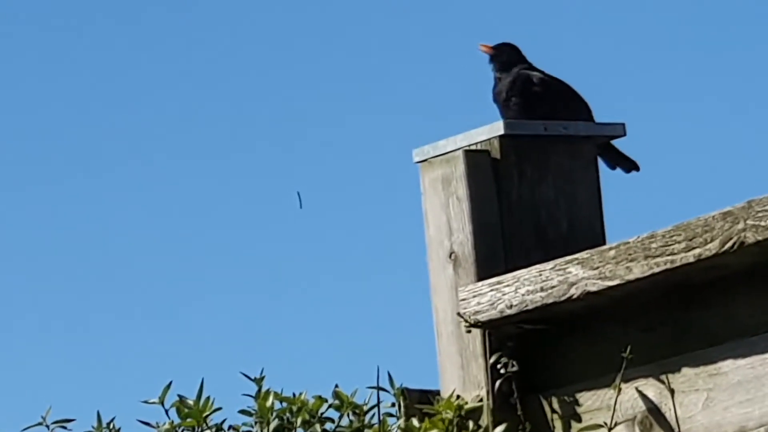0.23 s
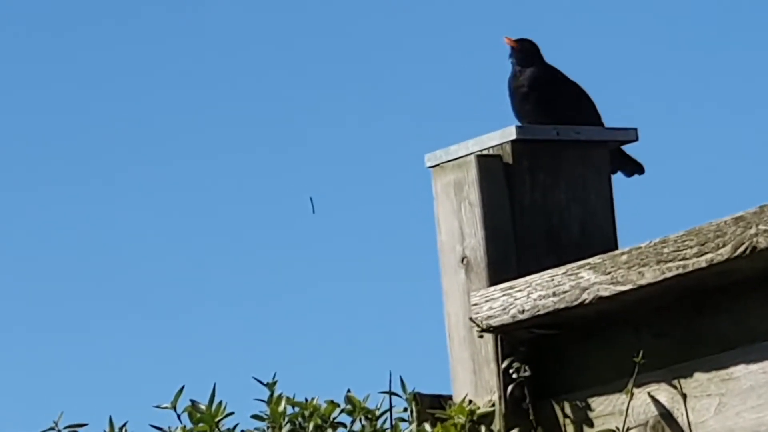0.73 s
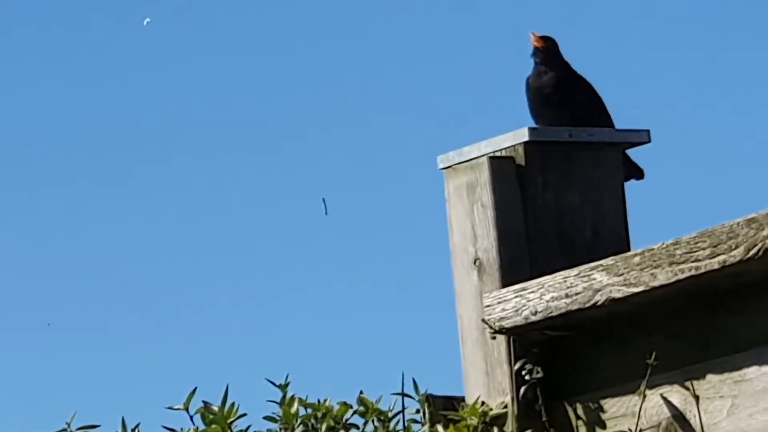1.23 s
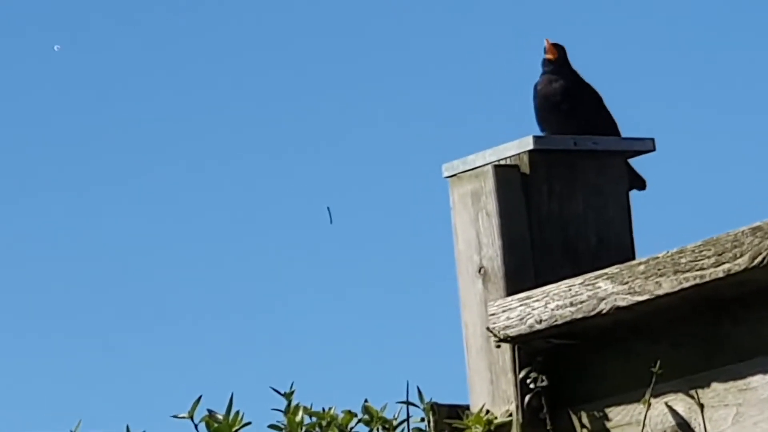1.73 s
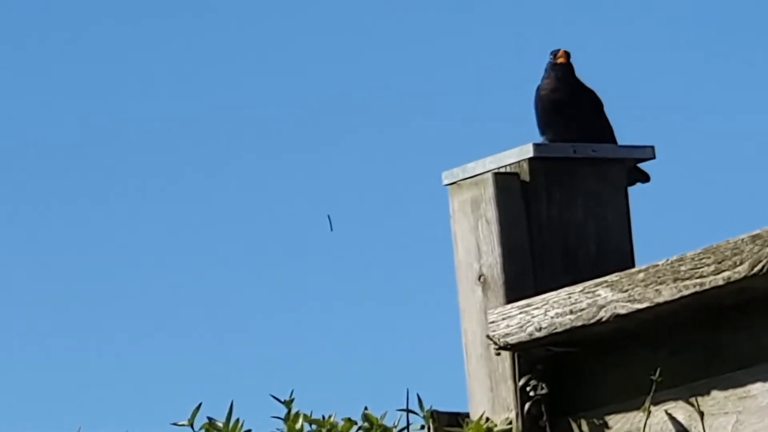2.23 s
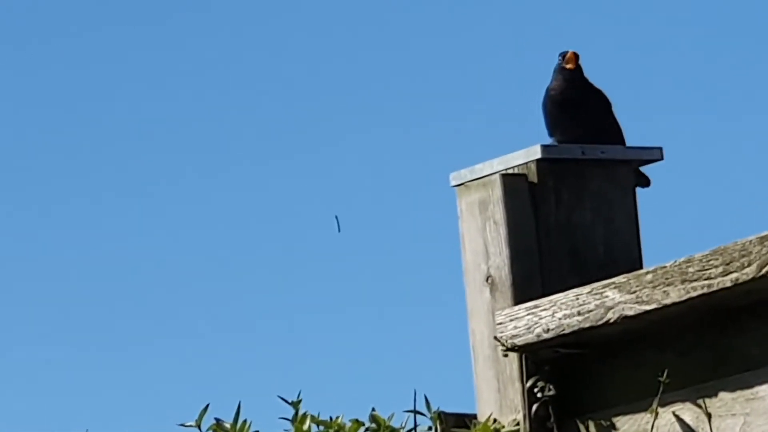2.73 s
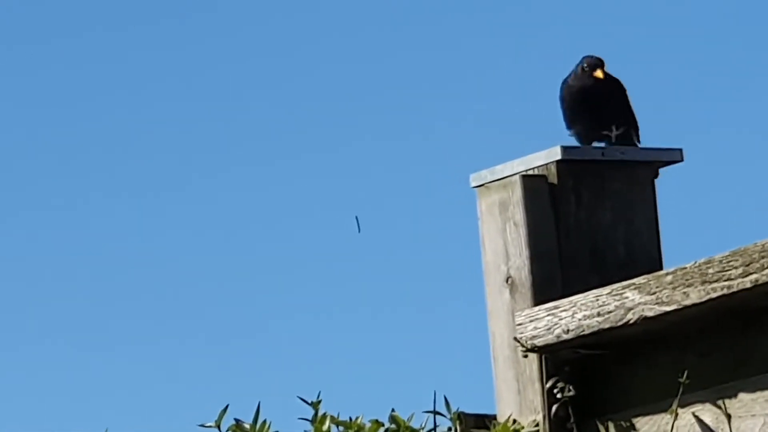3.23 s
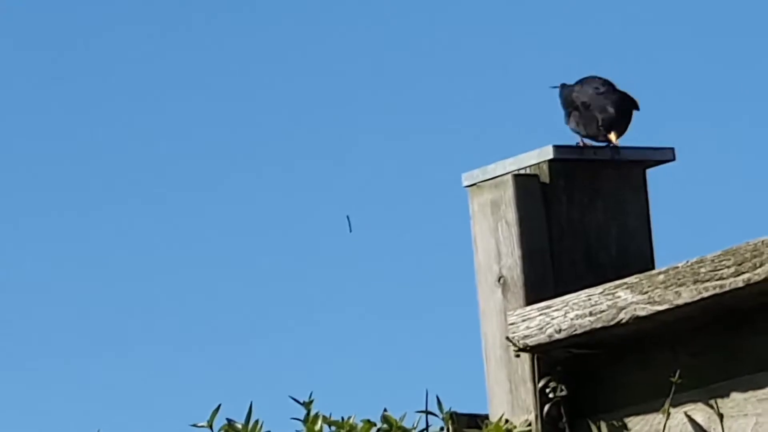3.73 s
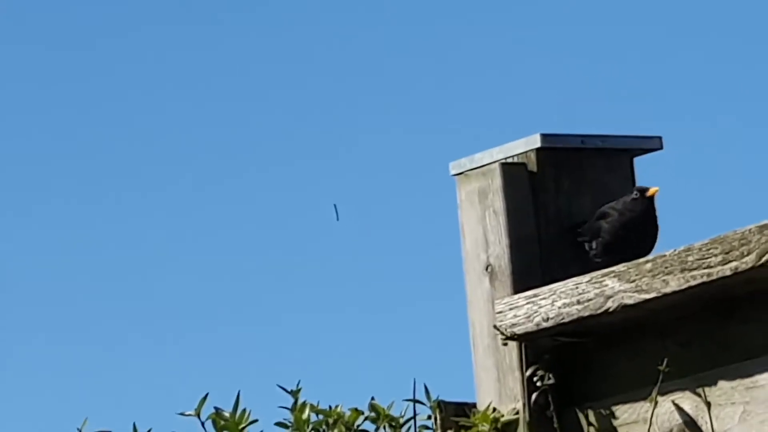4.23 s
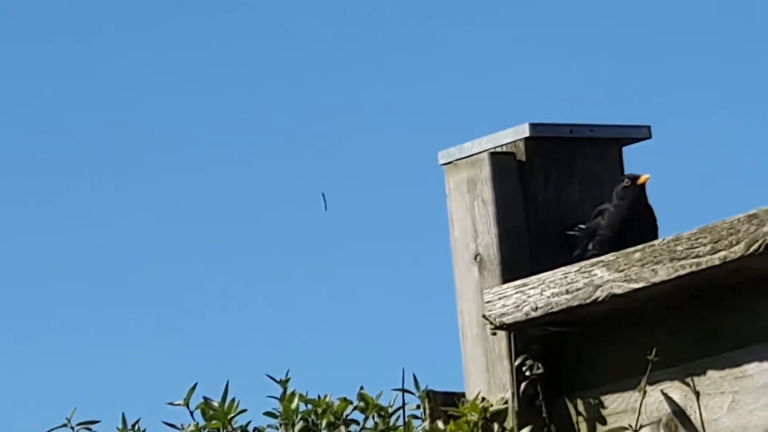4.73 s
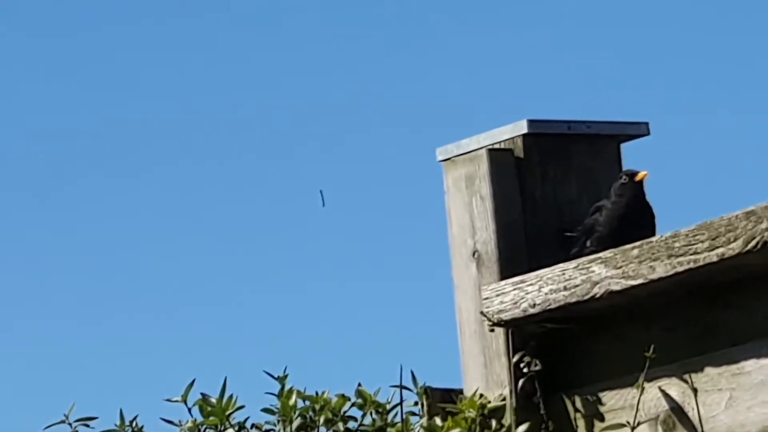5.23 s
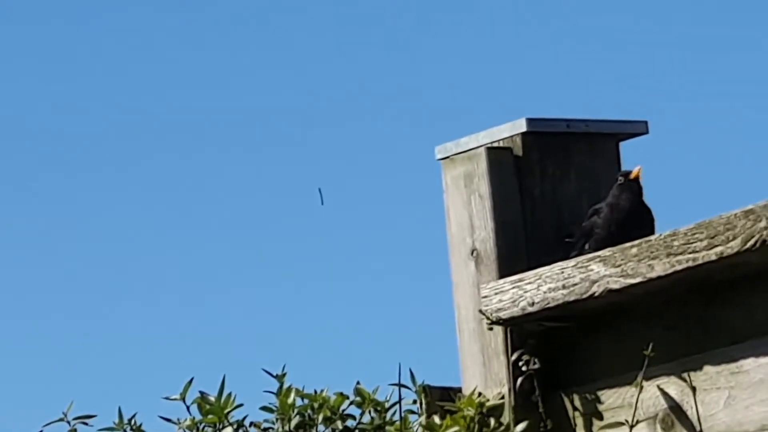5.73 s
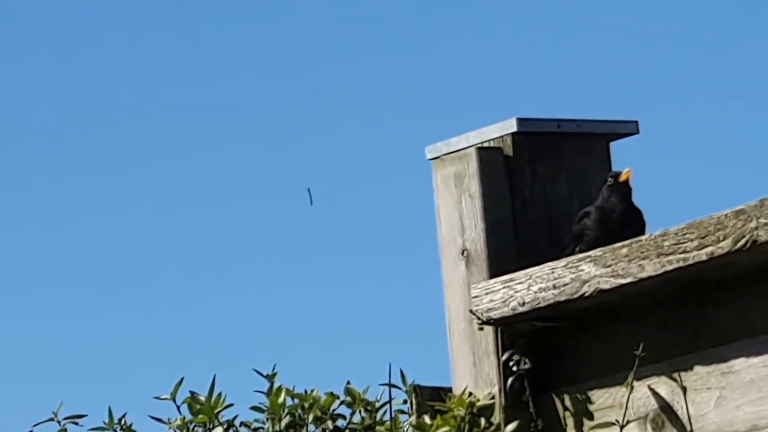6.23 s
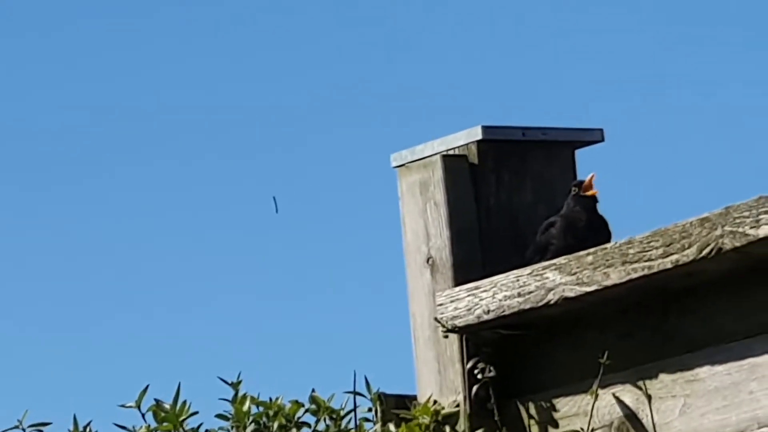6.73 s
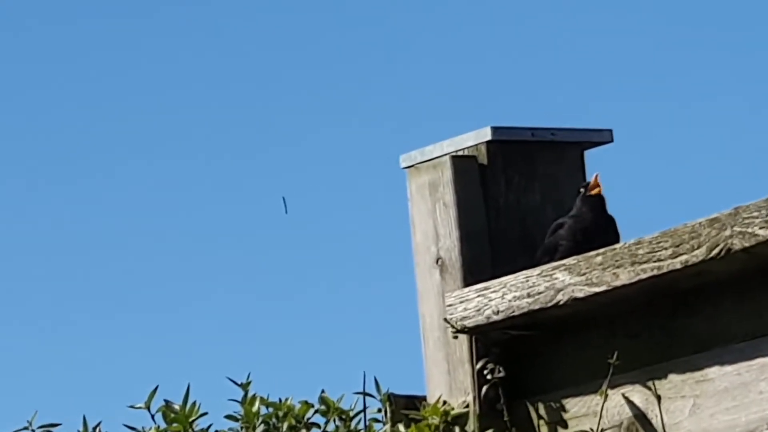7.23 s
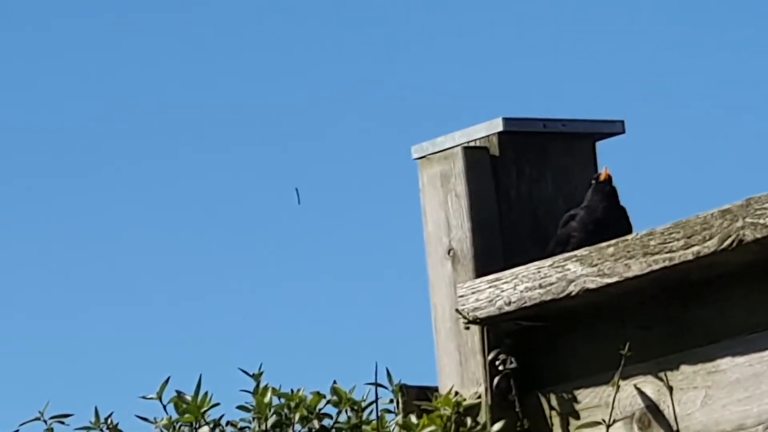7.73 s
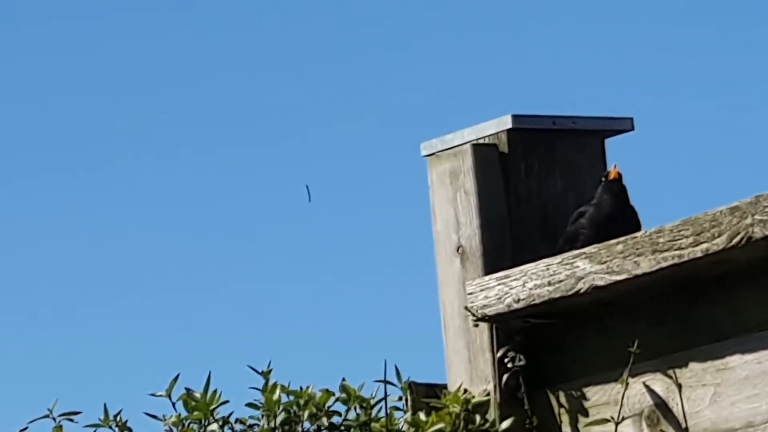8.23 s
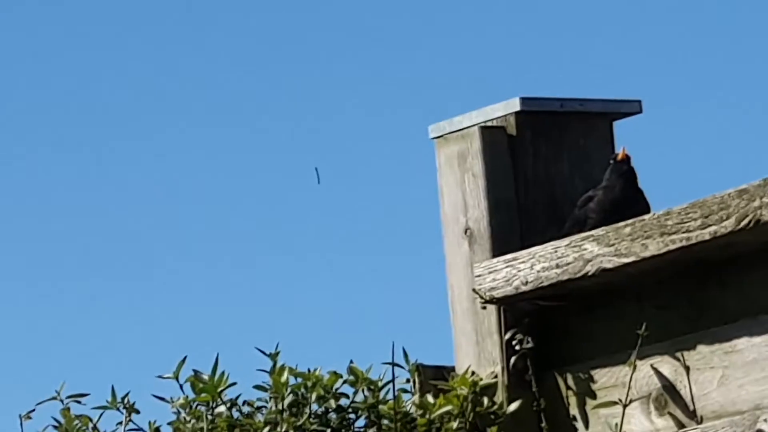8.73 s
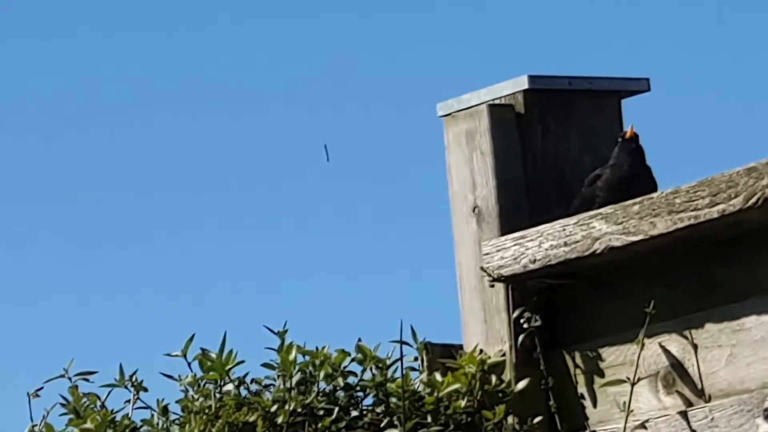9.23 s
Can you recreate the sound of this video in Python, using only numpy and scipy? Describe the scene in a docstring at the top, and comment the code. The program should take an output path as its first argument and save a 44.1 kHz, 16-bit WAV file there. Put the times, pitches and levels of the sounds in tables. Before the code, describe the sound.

A single blackbird warbles in a garden, pauses, then sings again and ends in thin twittering, with a distant motor humming underneath.

```python
"""A blackbird sings two phrases from a garden fence: fluted, warbling notes from both sides of its
syrinx, then a rasp, a thin twitter with falling chirps and a snap of the beak. House walls throw the
song back. Behind it, a distant motor hums over a faint outdoor rush. A few soft bumps reach the left
microphone."""
import sys
import numpy as np
from scipy import signal
from scipy.fft import rfft, irfft, next_fast_len
from scipy.io import wavfile
from scipy.ndimage import uniform_filter1d, map_coordinates

SR = 44100
rng = np.random.default_rng(int(sys.argv[2]) if len(sys.argv) > 2 else 0)


def file_out(sig):
    """Save sig as 16-bit WAV at sys.argv[1]."""
    # one column per channel
    cols = np.atleast_2d(sig).T
    # limit, then scale
    lim = np.clip(cols, -1, 1)
    pcm = np.round(lim * 32767).astype(np.int16)
    wavfile.write(sys.argv[1], SR, pcm)


N = 417627


def amp(db):
    """Decibels to gain."""
    return 10 ** (np.asarray(db) / 20)


def unit(x):
    """Scale to rms 1."""
    return x / np.sqrt(np.mean(x ** 2) + 1e-20)


def along(points, hz):
    """Interpolate (freq_hz, value) points on a log axis."""
    freq_hz, value = np.transpose(points)
    return np.interp(np.log(hz + 1), np.log(freq_hz + 1), value)


def wobble(rate_hz, size):
    """Smooth random curve, rate_hz knots a second."""
    knots = rng.standard_normal(int(size * rate_hz / SR) + 4)
    return map_coordinates(knots, [np.arange(size) * rate_hz / SR])


def filtered(x, response):
    """Apply the frequency response response(hz)."""
    size = x.shape[-1]
    padded = next_fast_len(size + 8192)
    return irfft(rfft(x, padded) * response(np.fft.rfftfreq(padded, 1 / SR)), padded)[..., :size]


def noise(colour, size):
    """Noise of rms 1 with the given spectral shape."""
    return unit(filtered(rng.standard_normal(size), lambda hz: amp(along(colour, hz))))


def add(track, start_s, sound):
    """Mix a sound into a track."""
    part = track[max(round(start_s * SR), 0):][:len(sound)]
    part += sound[:len(part)]


def panned(x, left_db):
    """Stereo, left louder by left_db."""
    return x * amp([[left_db / 2], [-left_db / 2]])


def bursts(events, colour, rise_s, gain_db):
    """Puffs of coloured noise that swell for rise_s and die away."""
    out = np.zeros(N)
    age = np.arange(SR // 10) / SR / rise_s
    for start_s, level_db in events:
        add(out, start_s, amp(level_db + gain_db) * age * np.exp(1 - age) * noise(colour, len(age)))
    return out


def air(level_db, drift_db):
    """Distant outdoor rush: alike on both sides in the bass, unrelated hiss above."""
    # rush spectrum: freq_hz, relative_db
    colour = [(30, -25.5), (70, -9.5), (115, -12.5), (180, -21.5), (280, -26), (450, -33), (700, -34.5),
              (1260, -39.5), (3000, -42.5), (6500, -45.5), (7500, -51), (9000, -54), (11500, -44),
              (15500, -41)]
    # left-right likeness: freq_hz, coherence
    likeness = [(60, 0.98), (180, 0.24), (550, 0.35), (1650, 0.0023), (4970, -0.03), (15000, -0.02)]

    def mid_side_gains(hz):
        angle = np.arccos(np.clip(along(likeness, hz), 0, 1)) / 2
        return np.array([np.cos(angle), np.sin(angle)])

    mid, side = filtered(np.array([noise(colour, N), noise(colour, N)]), mid_side_gains)
    rush = panned(np.array([mid + side, mid - side]), left_db=1.5)
    return rush * amp(level_db + drift_db * wobble(3.182, N))


def motor_hum(waver_db, rumble_db):
    """Odd multiples of a motor's shaft speed; the lowest throbs against a narrow rumble."""
    # shaft harmonics: freq_hz, relative_db
    harmonics = [(49.1, -0.5), (147.3, -13.5), (245.5, -22.5), (441.9, -32.5)]
    # hum loudness: time_s, level_db
    loudness = [(0.0, -52.5), (2.6, -53), (4.7, -56), (5.7, -55.5), (6.3, -53.5), (9.47, -54)]
    # rumble spectrum: freq_hz, relative_db
    colour = [(25, -33.5), (38, -23.5), (45, -3.5), (52, 1.5), (62, -1.5), (75, -18), (130, -59.5)]
    t = np.arange(N) / SR
    tones = np.zeros(N)
    for hz, db in harmonics:
        tones += amp(db + waver_db * wobble(1.856, N)) * np.sin(2 * np.pi * (hz * t + rng.random()))
    rumble = amp(rumble_db) * noise(colour, N)
    swell = amp(np.interp(t, *np.transpose(loudness)))
    return panned(swell * (np.sqrt(2) * tones + rumble), left_db=2.5)


def bumps(thud_hz, t60_s, thud_gain_db):
    """Each touch near the left microphone gives a low, heavily damped thud and a brief scuff."""
    # touches: start_s, thud_db, scuff_db
    touches = [(3.002, -42, -58), (3.052, -52, -52), (3.082, -38.5, -51.5), (3.167, -42.5, -57),
               (3.188, -39, -51), (3.265, -39.5, -59), (6.374, -50, -64), (8.625, -46.5, -82)]
    # scuff spectrum: freq_hz, relative_db
    colour = [(100, -3.5), (300, 8.5), (750, -6.5), (1200, -26), (2500, -42.5)]
    t = np.arange(SR // 10) / SR
    attack = 1 - np.exp(-t / 0.0027)
    thud = -amp(thud_gain_db - 60 * t / t60_s) * attack * np.sin(2 * np.pi * thud_hz * t)
    scuffs = [(start_s, scuff_db) for start_s, _, scuff_db in touches]
    out = bursts(scuffs, colour, rise_s=0.0016, gain_db=-2)
    for start_s, thud_db, _ in touches:
        add(out, start_s, amp(thud_db) * thud)
    return panned(out, left_db=23)


def yard(x, direct_db, walls_db, tail_db, build_s, left_lag_s=0.00008):
    """Direct sound, slaps off fence and walls, and a diffuse tail, different at each microphone."""
    # yard decay: freq_hz, t60_s
    decay = [(300, 0.082), (2000, 0.44), (4000, 0.27), (7000, 0.355), (14000, 0.31)]
    # side balance, left brighter: freq_hz, left_minus_right_db
    balance = [(1400, -5.5), (2400, 2), (4400, 3.5), (8000, 19.5), (15000, 11)]
    hz, t, spectra = signal.stft(rng.standard_normal((2, SR * 3 // 4)), SR, nperseg=256)
    spectra *= amp(-60 * t / along(decay, hz)[:, None]) * (1 - np.exp(-t / build_s))
    tail = signal.istft(spectra, SR, nperseg=256)[1]
    walls = np.zeros_like(tail)
    for side in walls:
        delays_s = rng.uniform(.001, .026, size=12)
        side[(delays_s * SR).astype(int)] = rng.choice([-1, 1], size=12) * np.exp(-delays_s / 0.0077)
    tail *= amp(tail_db) / np.linalg.norm(tail, axis=1, keepdims=True)
    walls *= amp(walls_db) / np.linalg.norm(walls, axis=1, keepdims=True)
    echoes = signal.fftconvolve(x[None], tail + walls, axes=1)[:, :N]
    direct = amp(direct_db) * filtered(x, lambda f: np.exp(np.outer([-2j * np.pi * left_lag_s, 0], f)))
    return filtered(direct + echoes, lambda f: amp(np.outer([.5, -.5], along(balance, f))))


def beak_snap():
    """The beak shuts with one bright click."""
    # snap: start_s, level_db
    snaps = [(9.2152, -47)]
    # snap spectrum: freq_hz, relative_db
    colour = [(2500, -41), (4500, -14), (6300, 12), (9000, 3.5), (16000, -23)]
    return bursts(snaps, colour, rise_s=0.0006, gain_db=-1)


def rasp():
    """A quick run of noise puffs over the deepest warbles."""
    # puffs: start_s, level_db
    puffs = [(7.247, -47), (7.2689, -38.5), (7.2848, -38), (7.3231, -36), (7.3513, -34), (7.4407, -40.5),
             (7.487, -42), (7.5254, -40), (7.5662, -43.5)]
    # rasp spectrum: freq_hz, relative_db
    colour = [(1200, -56), (1800, -10.5), (3600, -15), (4300, 6.5), (5000, -20.5), (5800, -6.5),
              (6500, -7.5), (8000, -14.5), (11000, -36.5), (16000, -26.5)]
    return bursts(puffs, colour, rise_s=0.0039, gain_db=-5.0)


def chirp_contours(length_s=0.11, half_drop_s=0.052, floor_hz=2596, swing_hz=210, whistle_swing_hz=150):
    """Each chirp holds its top pitch, then drops; the other side of the syrinx adds a sagging whistle."""
    # closing chirps: start_s, top_hz, level_db
    chirps = [(8.247, 5315, -49), (8.402, 5121, -48.5), (8.52, 5009, -51.5)]
    peak_s, width_s, swell_db = 0.032, 0.022, 13
    whistle_s, whistle_top_hz, sag_hz_per_s = 0.044, 6466, 7500
    t = np.arange(0, length_s, 1 / SR)
    early = t[t < whistle_s]
    envelope_db = -swell_db * (1 - np.exp(-((t - peak_s) / width_s) ** 2))
    whistle_hz = whistle_top_hz - sag_hz_per_s * early
    for start_s, top_hz, level_db in chirps:
        pitch_hz = floor_hz + (top_hz - floor_hz) / (1 + (t / half_drop_s) ** 4.2)
        yield start_s + t, pitch_hz, level_db + envelope_db, swing_hz, 0
        yield start_s + early, whistle_hz, level_db - 15.5, whistle_swing_hz, 0


def note_contours(edge_s, onset_db=6.5, onset_s=0.0064):
    """One push of air a note: pitch bends in an arc, level swells and sinks, warble is widest midway."""
    # sung notes, with a few faint overtones and a lingering ring beneath the closing chirps:
    # start_s, length_s, opening_hz, middle_hz, closing_hz, level_db, peak_fraction, swell_db,
    # swing_hz, overtones_db
    notes = [ (0.223, 0.18, 1330, 1805, 1955, -43.5, 0.73, 35.5, 12, -3),
             (0.387, 0.148, 1954, 1972, 1702, -41, 0.7, 11, 22, -4.5),
             (0.355, 0.19, 5186, 5365, 6020, -70, 1, 7.5, 25, -19),
             (0.638, 0.175, 2577, 2286, 2366, -41.5, 0.7, 9, 270, -3),
             (0.972, 0.155, 2880, 3121, 2685, -47.5, .7, 19, 240, 14),
             (1.025, 0.32, 1794, 1919, 1871, -45.5, .68, 14, 77, -3.5),
             (1.061, 0.25, 4860, 4510, 4420, -68.5, .2, 12, 70, -22),
             (1.105, 0.235, 2586, 2475, 2383, -45, .4, 4, 97, 2.5),
             (1.422, 0.07, 1690, 1906, 1723, -48.5, 0.6, 9, 21, -3),
             (1.44, 0.131, 3050, 2753, 2817, -43.5, 0.72, 13.5, 80, 6.5),
             (1.507, 0.065, 2034, 1856, 1542, -46.5, 0.49, 14.5, 95, 8),
             (1.65, 0.16, 1956, 2196, 2220, -42, 0.64, 8.5, 218.6, -0.5),
             (1.799, 0.095, 3118, 3080, 2920, -43, 0.5, 11, 16, 12),
             (1.891, 0.032, 2946, 2877, 2550, -37.5, 0.2, 14.5, 40, -3),
             (1.99, 0.325, 1788, 2380, 2388, -39, 0.42, 15.5, 150, -0.5),
             (2.509, 0.065, 6220, 6990, 7710, -49.5, 1, 20, 400, 1.5),
             (2.526, 0.07, 3250, 4760, 6580, -52.5, 1, 20, 380, 7),
             (2.585, 0.06, 6550, 5196, 4240, -50.5, 0.6, 9.5, 430, 8.5),
             (2.669, 0.12, 2200, 2343, 2790, -45.5, 0.88, 18.5, 307, 1),
             (2.778, 0.095, 2720, 3285, 3986, -46, 0.48, 12.5, 350, -1),
             (2.752, 0.1, 4830, 6130, 6750, -60.5, 0.6, 4.5, 450, -11),
             (2.812, 0.076, 3814, 3887, 3852, -47, 1, 7, 17, 0.5),
             (4.351, 0.142, 2009, 2038, 2135, -71.5, 0.7, 14, 10.6, -1.5),
             (4.52, 0.12, 2684, 2495, 2372, -61.5, 0.57, 10.5, 23, 0),
             (4.627, 0.11, 2380, 2300, 2183, -70.5, .3, -1, 280, 5),
             (4.933, 0.32, 2462, 2338, 2308, -62.5, 0.38, 10.5, 23, 3),
             (5.397, 0.11, 1800, 1784, 1570, -58.5, 0.29, 12, 136, -1),
             (5.495, 0.145, 1575, 1949, 2384, -47, 1, 16.5, 278, -10.5),
             (5.636, 0.04, 2640, 3150, 3274, -53, 0.1, 7, 99, 4),
             (5.672, 0.073, 3240, 3307, 3287, -53, 0.3, 2.5, 10.2, 3),
             (5.945, 0.095, 2610, 2506, 2459, -45, 0.97, 20.5, 40, -2),
             (6.007, 0.077, 2080, 2057, 1881, -44, .62, 11.5, 12, -2),
             (6.074, 0.1, 2000, 2067, 2005, -38.5, 0.18, 17, 7.7, -5),
             (6.205, 0.085, 2520, 1950, 1702, -42.5, 0.31, 20, 191, -12.5),
             (6.28, 0.085, 1707, 1665, 1743, -61.5, 0, 14, 192, 0),
             (6.384, 0.11, 2162, 2390, 2193, -47, 0.2, 14.5, 133, -21),
             (6.378, 0.13, 3280, 3439, 3564, -48.5, 0.35, 20, 164, -3),
             (6.479, 0.128, 2258, 2419, 2497, -39, 0.5, 7.5, 275, -1.5),
             (6.719, 0.069, 2390, 2587, 2695, -41, .62, 21.5, 45, 8.5),
             (6.742, 0.155, 1622, 1920, 2140, -54.5, .72, 11, 28, 0),
             (6.783, 0.15, 2725, 2881, 2910, -38, .42, 22, 28, -0.5),
             (6.966, 0.125, 2660, 2449, 2390, -37.5, 0.74, 10, 64, -1),
             (7.08, 0.1, 2380, 2247, 2176, -42.5, 0.16, 14.5, 188, 0.5),
             (7.089, 0.075, 4635, 4510, 4450, -67, .5, 4.5, 120, -19.5),
             (7.239, 0.13, 5160, 5365, 4790, -53, 0.4, 4, 1620, 8),
             (7.269, 0.09, 2400, 2326, 2050, -59, 0, 9.5, 520, 3),
             (7.35, 0.16, 3363, 2450, 2714, -52, 0.1, 1, 715, 6),
             (7.479, 0.11, 4206, 4144, 3950, -51.5, 0, 4.5, 1000, -3),
             (7.514, 0.086, 2500, 2304, 2128, -59, 0.3, 5, 530, 9),
             (7.873, 0.095, 6600, 6800, 6310, -56.5, 0.44, 13.5, 66, -5),
             (7.887, 0.08, 2284, 2412, 2600, -69, 0.3, 4, 280, -1.5),
             (7.89, 0.06, 4400, 4550, 5700, -69.5, 0.9, 3.5, 430, -0.5),
             (7.965, 0.12, 6320, 6330, 6540, -68, .5, -6, 130, -5.5),
             (8.095, 0.095, 6270, 6870, 6620, -50.5, 0.5, 11, 130, -1),
             (8.295, 0.36, 2827, 2983, 2797, -70, 0.45, 7, 130, 3.5),
             (8.623, 0.045, 5813, 5740, 5445, -70.5, .5, 10, 55, 0),
             (9.151, 0.04874, 6300, 6590, 6474, -71, .9, 12.5, 35, 1.5), ]
    for start_s, length_s, *arc_hz, level_db, peak_fraction, swell_db, swing_hz, overtones_db in notes:
        t = np.arange(-edge_s, length_s + edge_s, 1 / SR)
        progress = np.clip(t / length_s, 0, 1)
        pitch_hz = np.polyval(np.polyfit([0, .5, 1], arc_hz, 2), progress)
        peak = np.clip(peak_fraction, .02, .98)
        rise = np.maximum(peak - progress, 0) / peak
        fall = np.maximum(progress - peak, 0) / (1 - peak)
        envelope_db = level_db - swell_db * (rise ** 2.08 + 0.91 * fall ** 1.93)
        envelope_db -= onset_db * np.exp(-np.maximum(t, 0) / onset_s)  # the syrinx is slow to start
        taper = .55 + .45 * np.sin(np.pi * progress)
        yield start_s + t, pitch_hz, envelope_db, swing_hz * taper, overtones_db


def syrinx_side(contour, warble_phase, edge_s, jitter=0.0023, flutter_db=2.44, purity_db=11.5):
    """One side of the syrinx: a near-pure tone, its pitch shaken by the fast warble."""
    # overtone transmission of throat and beak: freq_hz, gain_db
    throat = [(3000, -36.5), (4500, -42.5), (6300, -25), (9300, -32.5), (12500, -28), (16000, -35)]
    t, pitch_hz, level_db, swing_hz, overtones_db = contour
    size = len(t)
    depth = swing_hz / pitch_hz
    shake = warble_phase[np.clip((t * SR).astype(int), 0, N - 1)]
    shake += 26 * depth ** 2 * wobble(170, size)  # the deepest warbles lose their beat and rasp
    hz = pitch_hz * (1 + jitter * wobble(300, size)) + swing_hz * np.sin(shake)
    phase = 2 * np.pi * np.cumsum(hz) / SR
    tone = np.sin(phase)
    calm = np.exp(-swing_hz / 70) * np.clip((3300 - hz) / 800, 0, 1)  # low, steady notes are purest
    scatter_rad = .7 * wobble(1100, size)  # unequal cycles blur the upper overtones into a sizzle
    for k in range(2, 7):
        gain = amp(along(throat, k * hz) + overtones_db - .5 * k - purity_db * calm)
        tone += gain * (k * hz < SR / 2) * np.sin(k * phase + (k - 2) * scatter_rad)
    # a deep warble chokes the airflow once a cycle, in uneven pulses
    pulsing = unit(amp(24.5 * depth * (np.cos(shake) + .6 * wobble(90, size))))
    ramp = np.clip(np.minimum(t - t[0], t[-1] - t) / edge_s, 0, 1)
    gate = np.sin(np.pi / 2 * ramp) ** 2
    return np.sqrt(2) * tone * gate * pulsing * amp(level_db + flutter_db * wobble(88.6, size))


def combination_tones(x, gain_db):
    """Sounding together, the two sides of the syrinx shake each other and add a ladder of tones above."""
    # coupling strength: time_s, relative_db
    coupling = [(1.1, 5.5), (1.5, -2.5), (6.3, -7.5), (6.39, 16), (6.48, 20), (6.55, 3.5), (6.88, 11),
                (7.0, 5.5), (8.7, -22)]
    # sideband high-pass: freq_hz, gain_db
    highpass = [(3200, -45), (3800, -2.0), (5000, -6), (6500, 1.5)]
    analytic = signal.hilbert(x, next_fast_len(N))[:N]
    envelope = np.abs(analytic)
    smooth = uniform_filter1d(uniform_filter1d(envelope, size=50), size=50)
    # evening out the beats throws off sidebands
    sidebands = analytic.real * (smooth - envelope) / (envelope + smooth + 1e-9)
    upper = filtered(sidebands, lambda hz: amp(along(highpass, hz)))
    return upper * amp(gain_db + np.interp(np.arange(N) / SR, *np.transpose(coupling)))


def song(warble_hz, unsteadiness, edge_s=0.005):
    """Notes and chirps; the same muscles shake both sides of the syrinx, so they warble in step."""
    out = np.zeros(N)
    warble_phase = 2 * np.pi * np.cumsum(warble_hz * (1 + unsteadiness * wobble(60, N))) / SR
    for contour in [*note_contours(edge_s), *chirp_contours()]:
        times_s = contour[0]
        add(out, times_s[0], syrinx_side(contour, warble_phase, edge_s))
    return out + combination_tones(out, gain_db=-0.5)


def blackbird():
    """Song, rasp and beak snap through the yard; a treble band is muffled at the microphones."""
    # microphone port response: freq_hz, gain_db
    ports = [(6750, 1), (7200, -24.5), (8300, -19.5), (9400, -5.5), (11000, -2)]
    voice = song(warble_hz=111.0, unsteadiness=.09) + rasp()
    snap = beak_snap()
    heard = yard(voice, direct_db=-4.0, walls_db=-5, tail_db=-6, build_s=0.013)
    # the snap is aimed at the listener and excites the yard less
    heard += yard(snap, direct_db=-0.5, walls_db=-8, tail_db=-8, build_s=0.017)
    return filtered(heard, lambda hz: amp(along(ports, hz)))


def scene():
    """Bird, bumps, motor and air in stereo."""
    return (blackbird()
            + bumps(thud_hz=118.3, t60_s=0.041, thud_gain_db=2.5)
            + motor_hum(waver_db=1.32, rumble_db=-13.5)
            + air(level_db=-66.5, drift_db=0.38))


def record(dry):
    """Brick-wall low-pass."""
    return filtered(dry, lambda hz: hz < 15750)


dry = scene()
out = record(dry)
file_out(out)
```